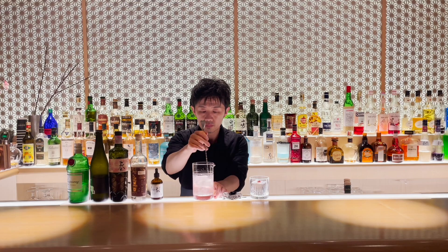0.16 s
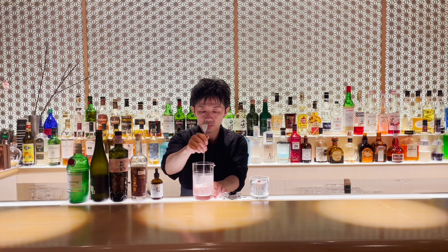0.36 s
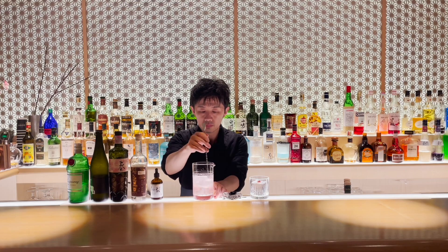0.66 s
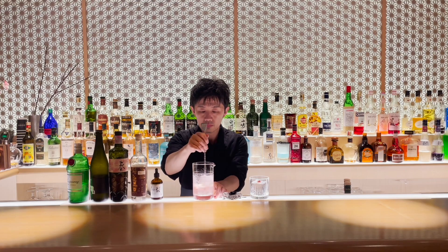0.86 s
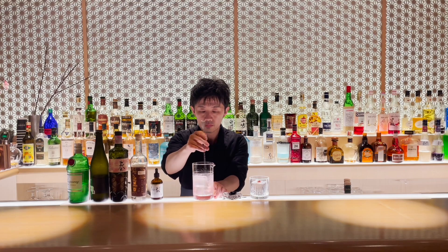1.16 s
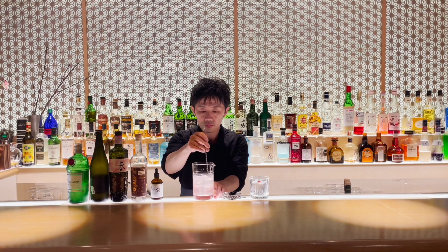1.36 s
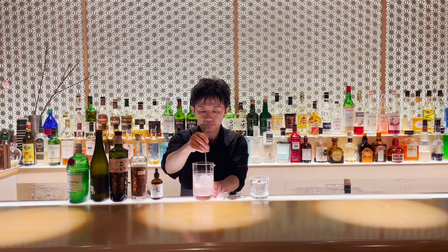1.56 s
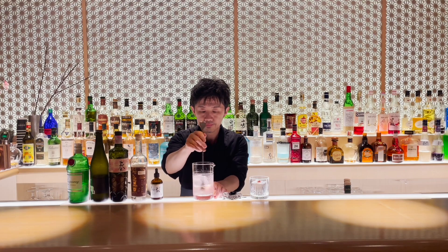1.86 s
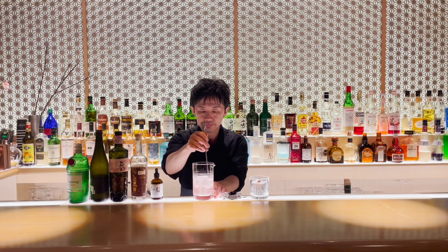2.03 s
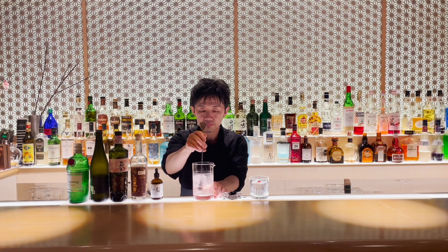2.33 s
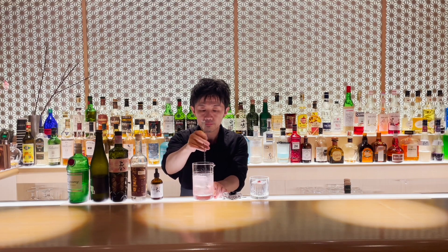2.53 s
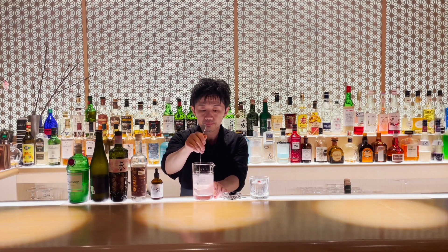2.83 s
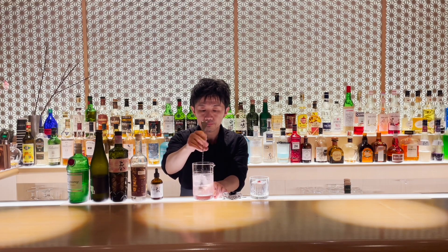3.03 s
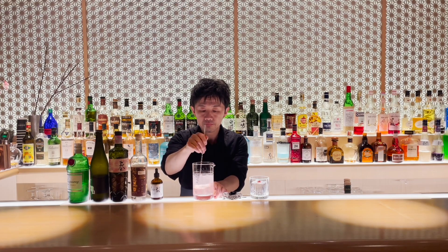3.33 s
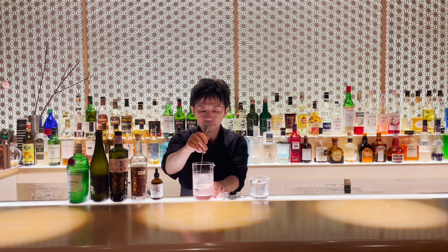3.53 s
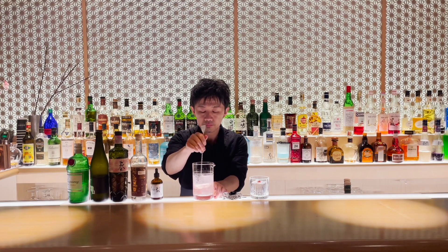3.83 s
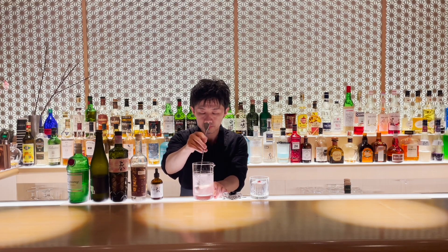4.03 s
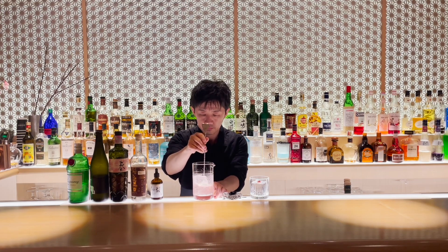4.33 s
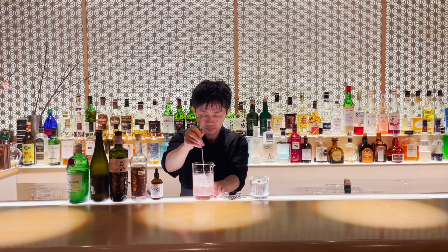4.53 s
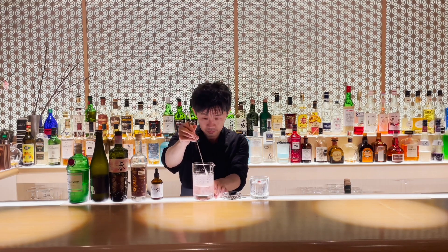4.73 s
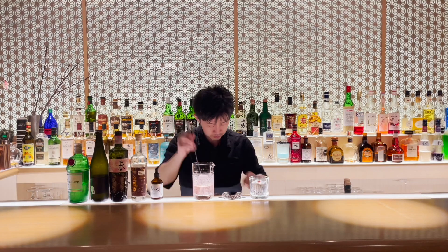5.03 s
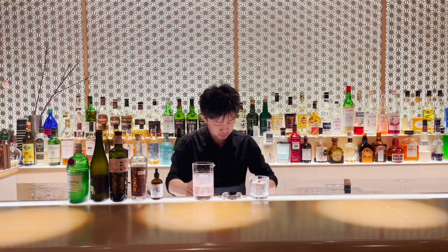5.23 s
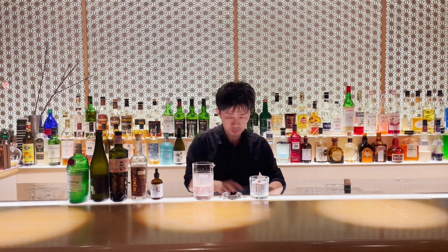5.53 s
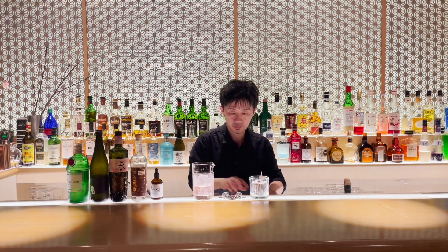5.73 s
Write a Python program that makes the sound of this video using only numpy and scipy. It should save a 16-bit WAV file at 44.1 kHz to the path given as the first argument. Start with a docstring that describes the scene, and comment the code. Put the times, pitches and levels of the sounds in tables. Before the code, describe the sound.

Ice cubes clink and knock in a stirred mixing glass until the spoon is laid on a metal tray, while coolers hum.

```python
"""A quiet bar: a long spoon stirs ice in a mixing glass, slows down, and is laid on a steel tray,
where it settles with a few light taps. The spoon ticks, cubes knock the glass and grate on each other,
and trapped air gurgles in the drink. Cooling machines hum under it all.
A lively room carries the clinks to a pair of microphone ports across the counter."""
import sys
import numpy as np
from scipy import signal
from scipy.fft import rfft, irfft, next_fast_len
from scipy.io import wavfile
from scipy.ndimage import uniform_filter1d

SR = 44100
rng = np.random.default_rng(int(sys.argv[2]) if len(sys.argv) > 2 else 0)


def transcribe(signal):
    """Save signal, clipped to [-1, 1], as a 16-bit WAV file at the path in sys.argv[1]."""
    frames = np.atleast_2d(signal).T
    limited = np.clip(frames, -1, 1)
    pcm = np.round(limited * 32767).astype(np.int16)
    wavfile.write(sys.argv[1], SR, pcm)


N = 259300

# rumble of the room air: freq_hz, relative_db
AIR_SPECTRUM = [(25, -7.5), (45, -3.5), (75, 0), (125, -8), (145, -12.5), (190, -12.5), (220, -20.5),
                (400, -27), (600, -33), (850, -31), (1150, -42), (3000, -51.5), (6000, -60), (12000, -69.5),
                (16000, -92)]
# how alike that rumble is left and right: freq_hz, likeness_share
AIR_LIKENESS = [(30, 0.89), (70, 0.8), (250, 0.75), (450, 0.59), (700, 0.065), (2000, 0.21), (4500, 0.58)]
# machine drones: pitch_hz, level_db, waver_share
DRONES = [(96.6, -46, 0.041), (113.7, -54, 0.0483), (253.9, -65, 0.00504), (434.9, -71, 0.0021)]
# the compressor's wandering hum: time_s, pitch_hz, level_db
COMPRESSOR_CURVE = [(0.0, 47.8, -54), (0.08, 48.46, -40), (0.7, 46.5, -47), (0.82, 49.53, -42.5),
                    (1.28, 46.44, -44), (2.13, 47.04, -38), (2.26, 42.9, -51.5), (2.41, 47.74, -42.5),
                    (3.24, 47.48, -43), (3.32, 46.6, -42), (3.85, 47.72, -47.5), (3.9, 49.4, -57),
                    (4.03, 49.46, -40.5), (4.68, 49.0, -41.5), (4.96, 46.22, -46), (5.27, 48.52, -40),
                    (5.8, 47.04, -42.5), (5.88, 49.8, -48)]
# reverb time: freq_hz, t60_s
ROOM_DECAY = [(500, 0.35), (2000, 0.45), (5000, 0.54), (10000, 0.31), (15000, 0.22)]
# air pockets between the cubes: start_s, level_db, pitch_hz, t60_s, pitch_spread_share
AIR_POCKETS = [(.685, -47, 815, 0.033, .12), (1.048, -48.5, 1414, 0.09, 0.038),
               (1.53, -45, 3410, 0.027, 0.092), (1.542, -45, 2920, 0.026, 0.091),
               (1.808, -48.5, 880, 0.028, 0.11), (2.035, -52, 810, 0.042, 0.13),
               (2.279, -46.5, 807, 0.038, 0.11), (2.285, -53, 1310, .03, 0.32),
               (2.877, -51, 1380, 0.035, .05), (3.178, -58, 810, 0.048, .1),
               (3.347, -48.5, 1360, 0.036, 0.054), (3.799, -52.5, 774, 0.061, 0.088),
               (4.37, -57.5, 810, 0.098, 0.019), (4.413, -55.5, 805, .09, 0.017),
               (4.448, -58, 800, 0.095, .02)]
# low modes of the glass in split pairs, the sixth a dull knock: pitch_hz, level_db, t60_s
WALL_MODES = [(1560, 0.5, 0.27), (1558.4, -3.5, 0.11), (1988, 6, 0.11), (1940, -0.5, 0.057),
              (2586, 1, 0.25), (1543, 4.5, 0.024), (2603, 1, 0.072)]
# the wall's second mode follows the swirling drink: time_s, pitch_hz
SWIRL_PITCH = [(0.3, 2003), (0.7, 1978), (0.9, 1950), (1.38, 1992), (1.55, 1984), (2.0, 1980), (2.3, 2010),
               (2.75, 2023), (3.6, 2070), (4.5, 2013)]
# cubes hit the wall, its second and third modes trimmed against the first:
# start_s, level_db, second_mode_db, third_mode_db, ring_time_share
CUBE_KNOCKS = [(.025, -56.5, -24, -2, 0.59), (.169, -65.5, -27, -17, 0.81), (0.2878, -56, -5.5, -19, 0.53),
               (0.361, -66.5, -11, -2, 0.41), (.413, -60.5, 1, 4, 1), (.5148, -64, -17, -13, 0.43),
               (.538, -67.5, 3.5, -22, 0.67), (0.608, -60, -42, -30, 0.7), (.687, -58.5, 4, 1, 0.54),
               (.778, -57.5, -21, -25, .6), (0.8039, -54.5, -15, -25, 0.47), (0.895, -51, -6, -2.5, 0.78),
               (1.1459, -65, 6, 5, 0.53), (1.24, -58, -1, 1.5, 0.37), (1.327, -58, -4, -23, 0.39),
               (1.377, -59, 7, 2.5, 0.53), (1.463, -65.5, -3, 4, 0.49), (1.538, -59, 6.5, 7, 0.33),
               (1.596, -60.5, -39, -26, 0.5), (1.6696, -62.5, 4, 2, 0.36), (1.682, -58.5, -18, -12, 0.59),
               (1.8081, -67, 4.5, -13, 0.47), (1.85, -68.5, 3, -12, 0.76), (1.902, -63, -18, 3, 0.52),
               (2.034, -59, -1, -3, .55), (2.149, -58, -11, -15, 0.31), (2.2165, -60.5, -19, -4, 0.79),
               (2.268, -55, 6, -15, 0.3), (2.39, -68, -13, -4, 0.65), (2.44, -55, -32, -19, 0.35),
               (2.5118, -67, -2, 1, .8), (2.6209, -63, -3, -6, 0.32), (2.73, -51.5, -6, -7, 0.85),
               (2.8407, -57.5, -25, -28, 0.31), (2.8774, -76, -5, -19, 0.53),
               (2.94, -53.5, -9.5, -2.5, 0.74), (3.0847, -68, 2, -16, .6), (3.1491, -51.5, -8, 0.5, 0.36),
               (3.247, -71, -22, 5.5, 0.47), (3.323, -62.5, -8, -13, 0.47), (3.347, -61.5, 3.5, -17, 0.44),
               (3.3777, -74.5, 3, 12, 1), (3.589, -60.5, -6, -25, 0.89), (3.619, -54.5, -17, -2.5, .8),
               (3.661, -57.5, -2, -6, 1), (3.806, -50.5, -10, -17, 0.66), (3.86, -63, 1, -1, .8),
               (4.04, -58, -19, -8, 0.47), (4.2257, -77, -22, -25, 0.53), (4.297, -64.5, -17, -23, 0.54),
               (4.4787, -68.5, -1, -13, 0.82)]
# one mode stands out of a clink and rings on: start_s, level_db, pitch_hz, t60_s
PINGS = [(.03, -61, 4675, 0.085), (.035, -58, 2794, 0.072), (.12, -61, 6390, 0.048),
         (.121, -59, 10000, .06), (.516, -65, 9960, .05), (.52, -58.5, 6400, .06),
         (0.523, -58, 4500, 0.073), (.61, -65, 9940, 0.091), (0.691, -63, 5610, 0.051),
         (0.807, -58.5, 5740, 0.11), (1.002, -60, 10000, .05), (1.012, -64, 5740, .12),
         (1.098, -64, 9570, .1), (1.24, -56.5, 5770, 0.096), (1.241, -58, 6390, .12),
         (1.46, -55, 9900, .05), (1.462, -57.5, 4997, 0.057), (1.545, -56.5, 3045, 0.037),
         (1.686, -61.5, 9900, 0.076), (2.151, -60.5, 4800, .1), (2.153, -67, 5700, 0.085),
         (2.218, -67, 6900, .08), (2.437, -58, 3310, 0.032), (2.45, -59, 6400, 0.061),
         (2.88, -64, 5890, 0.087), (3.36, -63, 5100, 0.081), (3.625, -57.5, 6407, 0.098),
         (3.835, -63.5, 5275, 0.11), (5.222, -53, 4054, 0.074), (5.7745, -61, 2240, 0.045)]
# colour of a bare clack: freq_hz, relative_db
CLACK_SPECTRUM = [(500, 7), (1200, 8), (2500, 7.5), (4000, -0.5), (7000, -1), (10000, -7.5), (12000, -17.5),
                  (14000, -9), (16000, -33)]
# upper modes of glass and spoon: pitch_hz, level_db, t60_s
GLASS_MODES = [(2990, 6.5, 0.01), (3770, -16, 0.026), (4290, -10.5, 0.14), (4680, -14, 0.043),
               (4940, 2.5, 0.017), (5230, 1.5, 0.017), (5360, -6, 0.065), (5720, 5, 0.028),
               (6356, -3.5, 0.05), (6800, -24.5, 0.075), (7343, -1, 0.13), (7600, -12, 0.098),
               (8780, 1.5, 0.042), (9300, 1.5, 0.032), (9920, -1, 0.049), (10060, -15, 0.07),
               (11600, -14, 0.044), (11030, -10, 0.072), (12700, -14.5, 0.025), (14200, -27.5, 0.069),
               (13000, -1.5, 0.023)]
# modes of the steel tray: pitch_hz, level_db, t60_s
TRAY_MODES = [(686, 3, 0.075), (888, -16, 0.089), (1490, -3, 0.065), (1722, -0.5, 0.041), (2240, 0, 0.028),
              (2540, -20, 0.04), (3650, -5, 0.082), (4200, 3, 0.026), (4120, 2, 0.063), (4400, -8, 0.1),
              (5190, -13, 0.063), (6370, -8, 0.026), (6480, 0.5, 0.036), (7010, -1, 0.072),
              (9140, -6, 0.085), (9720, -9.5, 0.091), (13000, -24, 0.056)]
# modes of the bouncing spoon: pitch_hz, level_db, t60_s
SPOON_MODES = [(3050, -0.5, 0.18), (3760, -0.5, 0.21), (4130, -23, .3), (4650, -4.5, 0.5),
               (6045, -6.5, 0.46), (6880, 0, 0.09), (10900, -5, 0.039), (11956, -10, .055)]
# modes of the spoon lying on the tray: pitch_hz, level_db, t60_s
RESTING_SPOON_MODES = [(1840, -10, 0.089), (3580, -8, 0.079), (3768, -5, 0.27), (3920, 1, .08),
                       (4075, -1, 0.23), (4320, -7, 0.091), (4760, -15, .1), (6470, -3, 0.19),
                       (6568, 1, 0.17), (6900, -6, .15), (7036, -5.5, 0.23), (9800, -1, 0.12)]
# spoon against ice and glass: start_s, level_db, bright_hz, rolloff_db_per_octave, top_end_db, slide_s
STIR_TICKS = [(0.0219, -48.5, 4360, -1, 0, 0.0075), (0.118, -48.5, 3980, 14, -6, 0.0054),
              (0.2863, -55.5, 4260, 16, -6.5, 0.028), (0.378, -51.5, 5700, 5, -2, 0.0033),
              (0.513, -48.5, 5100, 10, -0.5, .003), (0.606, -53, 4787, 0, 5, .004),
              (0.7708, -52.5, 3630, 21, -5.5, 0.0068), (0.8062, -54, 5750, 37, -21, 0.003),
              (0.85, -50.5, 3130, -1, 2.5, 0.0046), (0.895, -55, 5170, 11, -25, .004),
              (0.998, -50.5, 5100, -2.5, 2.5, 0.012), (1.012, -49.5, 1600, 58, -27, .006),
              (1.03, -47, 3660, 15, -8, 0.0058), (1.093, -50.5, 5740, -8, 4.5, 0.0068),
              (1.237, -47.5, 5630, 6, -2.5, .006), (1.322, -47, 4240, 13, -3, 0.0057),
              (1.457, -49.5, 4770, 0.5, 4.5, .006), (1.6837, -52.5, 4850, 15, -1.5, 0.0067),
              (1.764, -54, 3700, 7, 0, 0.0034), (1.9062, -52, 4280, -2.5, 3, 0.021),
              (1.996, -54, 5040, 5, -2, .006), (2.1498, -52, 5100, 15, 1, 0.0032),
              (2.2158, -48.5, 4954, 17, -2, 0.0056), (2.384, -54.5, 2900, 15, -11, 0.0031),
              (2.4359, -47, 3800, 16, -1, 0.0033), (2.449, -48.5, 6200, 10, -5.5, 0.0048),
              (2.684, -52.5, 4800, 15, 1.5, 0.016), (2.7, -48, 2908, 29, -8, 0.0042),
              (2.8782, -52.5, 5935, 5.5, 1, 0.003), (2.91, -51.5, 3700, 11, -6, 0.018),
              (2.94, -55.5, 3250, 17, -24, 0.0074), (3.081, -52, 5172, 7.5, -5, 0.0048),
              (3.1271, -53.5, 5110, 1, -2, 0.015), (3.318, -55, 5520, 16, -5, 0.014),
              (3.3572, -52.5, 5400, 6.5, -3, 0.01), (3.5384, -57.5, 4840, 7.5, -2, 0.0029),
              (3.6195, -45, 5490, 3, 2.5, 0.013), (3.643, -64, 4480, 4, -8, 0.0083),
              (3.76, -54.5, 3315, 7, -11, 0.016), (3.803, -51.5, 3700, 11, -9, 0.016),
              (3.834, -49.5, 5240, 14, -7, 0.012), (4.0412, -67, 3087, 9, -23, 0.006),
              (4.1765, -72, 5783, 10, -0.5, 0.0046), (4.2677, -63.5, 3083, -3, -2.5, 0.0044),
              (4.476, -66.5, 5690, 26, -25, .006)]
# hits that ring the tray: start_s, level_db, bright_hz, rolloff_db_per_octave, top_end_db, slide_s
TRAY_HITS = [(5.208, -46.5, 6500, 19.3, -2, 0.014), (5.2206, -45.5, 4200, 4.9, -1.5, 0.0027),
             (5.245, -67, 4100, 14, -6, .005), (5.285, -67, 1750, 29, -20, .005),
             (5.313, -49.5, 5560, 14, -1, .008), (5.335, -48.5, 1490, 10, 3, 0.0054),
             (5.358, -47, 6550, 6.3, 1, 0.0071), (5.385, -46, 5900, 6.4, -2, 0.0062),
             (5.43, -54.5, 5980, 13, 2.5, .005), (5.40, -43.5, 2300, 26, -20, 0.0026),
             (5.405, -45.5, 940, 76, -17, 0.0037), (5.425, -51, 2300, 28, -13, 0.0036),
             (5.45, -60, 2300, 28, -14, .005), (5.44, -50, 1420, 105, -20, 0.0045),
             (5.50, -71, 2220, 29, -16, .005), (5.547, -51.5, 4120, 7.7, 6, 0.0064),
             (5.59, -56.5, 1800, 38, -14, 0.0076), (5.7745, -58, 2266, 27, -21, 0.0014)]
# bounces that ring the spoon: start_s, level_db, bright_hz, rolloff_db_per_octave, top_end_db, slide_s
SPOON_BOUNCES = [(5.3574, -44.5, 4198, 1.3, 0.5, 0.00088), (5.412, -48.5, 4690, 8.7, -8, 0.0023),
                 (5.447, -45, 3740, 18, -11, .001), (5.478, -56, 3030, 20, -3, 0.0038),
                 (5.51, -49, 3770, 40, -18, .001)]
# the spoon's last light taps: start_s, level_db, bright_hz, rolloff_db_per_octave, top_end_db, slide_s
SETTLING_TAPS = [(5.548, -56, 4000, 1.8, -9, 0.0063), (5.577, -54.5, 4000, 5.8, 4, 0.0044),
                 (5.615, -57, 6500, 9.3, -2, 0.0036), (5.665, -64, 6500, 5.1, -6, 0.0055),
                 (5.78, -64, 3800, 9.7, -12, 0.0054), (5.84, -67.5, 3800, 3, -7, .006)]
# phase by which the left port leads: freq_hz, lead_rad
PORT_LEAD = [(0, 0), (1500, 0), (2800, .5), (5100, .7), (5700, 0), (6900, -1.3), (7650, -np.pi),
             (8800, -np.pi), (9200, -4.2), (10600, -2 * np.pi), (12500, -2 * np.pi), (13400, -8.3),
             (14300, -3 * np.pi)]
# balance of the ports: freq_hz, left_over_right_db
PORT_BALANCE = [(30, 0), (80, 2.5), (1000, 0.3), (2500, 2), (5200, 4), (6800, 3), (7700, 0.7)]
# what both ports hear alike: freq_hz, likeness_share
PORT_LIKENESS = [(1000, 0.01), (6500, 0.29), (7700, 1), (8600, 0.97), (9300, 0.76), (10200, 0.22),
                 (10800, 1), (12400, 1), (13200, 0.21), (14200, .9)]


def amp(db):
    """dB to gain."""
    return 10 ** (np.asarray(db) / 20)


def unit_rms(x):
    """Scales to rms 1."""
    return x / np.sqrt(np.mean(x ** 2) + 1e-20)


def curve_at(points, hz):
    """Reads a curve on a log-frequency axis."""
    freq_hz, value = np.transpose(points)
    return np.interp(np.log(hz + 1), np.log(freq_hz + 1), value)


def add(mix, start_s, sound):
    """Mixes a sound in at start_s."""
    part = mix[round(start_s * SR):][:len(sound)]
    part += sound[:len(part)]


def ring(hz, db, t60):
    """A struck body: one dying sine a mode."""
    t = np.arange(SR // 3)[:, None] / SR
    return (amp(db - 60 * t / np.maximum(t60, .01)) * np.sin(2 * np.pi * hz * t)).sum(1)


def waver(first_span, second_span):
    """Random drift at rms 1: noise smoothed twice, spans in samples."""
    return unit_rms(uniform_filter1d(uniform_filter1d(rng.standard_normal(N), first_span), second_span))


def contacts(per_s, spread_db):
    """Random impulses of uneven strength."""
    return (rng.random(N) < per_s / SR) * amp(spread_db * np.minimum(rng.exponential(1, N), 3))


def room_air(level_db=-45):
    """A bed of dark noise, nearly mono in the bass and wider above."""
    hz = np.fft.rfftfreq(N, 1 / SR)
    noise = rng.standard_normal((len(hz), 4)).T
    left, unrelated = noise[::2] + 1j * noise[1::2]
    likeness = curve_at(AIR_LIKENESS, hz)
    right = likeness * left + np.sqrt(1 - likeness ** 2) * unrelated
    spectrum = np.array([left, right]) * amp(curve_at(AIR_SPECTRUM, hz)) * (hz > 20)
    return amp(level_db) * unit_rms(irfft(spectrum, N))


def machine_drones():
    """Cooling machines hold low tones, steady in level and wavering in pitch."""
    out = np.zeros(N)
    for centre_hz, level_db, waver_share in DRONES:
        pitch_hz = centre_hz * (1 + waver_share * waver(4000, 2500))
        out += np.sqrt(2) * amp(level_db) * np.sin(2 * np.pi * np.cumsum(pitch_hz) / SR)
    return out


def compressor(flutter_db=2.5, flutter_s=0.1):
    """A deep hum that wanders in pitch, swells and flutters quickly in level."""
    time_s, pitch_hz, level_db = np.transpose(COMPRESSOR_CURVE)
    t, span = np.arange(N) / SR, round(flutter_s * SR)
    envelope = amp(np.interp(t, time_s, level_db) + flutter_db * waver(span, span))
    phase = 2 * np.pi * np.cumsum(np.interp(t, time_s, pitch_hz)) / SR
    return np.sqrt(2) * envelope * np.sin(phase)


def room_reverb(send, crossfade_hz=3.1):
    """Sparse reflections, each band dying at its own speed; three tails trade as glass and hands move."""
    taps = np.zeros((3, 2, SR // 2))
    grid = np.arange(120, SR // 2 - 20, 20)
    arrivals = grid + rng.integers(0, 20, (3, 2, len(grid)))
    np.put_along_axis(taps, arrivals, rng.choice([-1., 1.], arrivals.shape), 2)
    taps[:, 1] = 0.42 * taps[:, 0] + 1.07 * taps[:, 1]  # close ports share part of the tail
    hz, t, bands = signal.stft(taps, SR, nperseg=256)
    decay = amp(-60 * t / curve_at(ROOM_DECAY, hz)[:, None])
    tails = signal.istft(bands * decay, SR, nperseg=256)[1]
    tails /= np.linalg.norm(tails, axis=2, keepdims=True)
    cycles = crossfade_hz * np.arange(N) / SR + np.arange(3)[:, None] / 3
    crossfade = np.sqrt(2 / 3) * np.cos(2 * np.pi * cycles)
    return signal.fftconvolve((send * crossfade)[:, None], tails, axes=2)[:, :, :N].sum(0)


def ice_rattle(relative_db=-4, rest_db=-84.5, settle_t60_s=0.083):
    """Small cubes jostle after each knock: faint contacts ring the whole glass, damped by the ice."""
    jostle, envelope = np.zeros(N), np.zeros(N)
    for hz, mode_db, t60 in WALL_MODES + GLASS_MODES:
        jostle += signal.oaconvolve(contacts(per_s=40, spread_db=3.5), ring(hz, mode_db, .3 * t60))[:N]
    for start_s, level_db, *_ in CUBE_KNOCKS:
        add(envelope, start_s, amp(level_db + relative_db - 60 * np.arange(SR) / SR / settle_t60_s))
    stirring = np.arange(N) / SR < CUBE_KNOCKS[-1][0]
    return unit_rms(jostle) * (envelope + amp(rest_db) * stirring)


def ice_scrape(relative_db=-21.5, t60_s=0.22, grains_per_s=44, colours=8):
    """Ice grates on ice and spoon: tiny bright grains that fade after each tick."""
    grit, envelope = np.zeros(N), np.zeros(N)
    hz, t = np.fft.rfftfreq(512, 1 / SR), np.arange(512) / SR
    for centre_hz in np.geomspace(3500, 13000, colours):
        colour_db = curve_at(CLACK_SPECTRUM, hz) - 22 * abs(np.log2((hz + 1) / centre_hz))
        grain = irfft(rfft(rng.standard_normal(512)) * amp(colour_db)) * amp(-60 * t / 0.012)
        grit += signal.oaconvolve(contacts(grains_per_s / colours, spread_db=4.5), grain)[:N]
    for start_s, level_db, *_ in STIR_TICKS:
        add(envelope, start_s, amp(level_db + relative_db - 60 * np.arange(SR) / SR / t60_s))
    return unit_rms(grit) * envelope


def gurgles(bubbles=5, max_lag_s=.008, attack_s=0.00032):
    """Each trapped air pocket breaks into a few bubbles that ring briefly and rise in pitch."""
    out, t = np.zeros(N), np.arange(SR // 8) / SR
    for start_s, level_db, pitch_hz, t60, spread in AIR_POCKETS:
        envelope = (1 - np.exp(-t / attack_s)) * amp(level_db - 60 * t / t60) / np.sqrt(bubbles)
        for shift, lag in rng.uniform(-1, 1, (bubbles, 2)):
            chirp = np.sin(2 * np.pi * pitch_hz * (1 + spread * shift) * (t + 0.87 * t ** 2))
            add(out, start_s + max_lag_s * lag ** 2, envelope * chirp)
    return out


def cube_knocks(attack_s=.0015, detune=0.0015, scatter_db=1.5):
    """Blunt cubes ring the wall's three lowest modes; split pairs beat, the swirl retunes the second."""
    out = np.zeros(N)
    mode_hz, mode_db, t60 = np.transpose(WALL_MODES)
    attack = 1 - np.exp(-np.arange(SR // 3) / SR / attack_s)
    for start_s, level_db, second_db, third_db, ring_share in CUBE_KNOCKS:
        trim_db = np.array([0, 0, second_db, second_db, third_db, 0, third_db])
        scatter, shift = rng.standard_normal((2, len(mode_hz)))
        pitch_hz = mode_hz * (1 + detune * shift)
        pitch_hz[2:4] *= np.interp(start_s, *np.transpose(SWIRL_PITCH)) / mode_hz[2]
        struck_db = level_db + mode_db + trim_db + scatter_db * scatter
        add(out, start_s, attack * ring(pitch_hz, struck_db, ring_share * t60))
    return out


def pings(split_share=0.0042):
    """Single modes of glass, ice and steel sing out, each a close, beating pair."""
    out = np.zeros(N)
    for start_s, level_db, pitch_hz, t60 in PINGS:
        pair_hz = pitch_hz * (1 + split_share * rng.uniform(-1.24, 1, size=2))
        add(out, start_s, ring(pair_hz, level_db, t60))
    return out


def hit_eq_db(hz, bright_hz, rolloff, top_end_db):
    """The colour of one hit: a peak at bright_hz, and a flat shelf from 7.5 kHz up."""
    return np.where(hz < 7500, -abs(rolloff * np.log2((hz + 1) / bright_hz)), top_end_db)


def clinks(hits, modes, ring_db, clack_db, snap_db, scatter_db, detune):
    """Hard hits: a bright snap, then a chatter of contacts that each clack and ring split modes."""
    out = np.zeros(N)
    mode_hz, mode_db, t60 = np.transpose(modes + modes)  # two of each, detuned into pairs
    hz, t = np.fft.rfftfreq(1024, 1 / SR), np.arange(2048) / SR
    attack_s, clack_t60_s, snap_t60_s, snap_loss_db_per_s = .001, 0.04, 0.004, 900
    for start_s, level_db, bright_hz, rolloff, top_end_db, slide_s in hits:
        eq = bright_hz, rolloff, top_end_db
        noise, contact, touch = rng.standard_normal((3, 2048))
        chatter = (abs(contact) > 2.4) * abs(noise) * np.exp(-t / max(slide_s, .001))
        chatter[0] = 0.72  # the first contact
        clack_colour = amp(curve_at(CLACK_SPECTRUM, hz) + hit_eq_db(hz, *eq))
        clack = unit_rms(irfft(rfft(noise[:1024]) * clack_colour))
        pitch_hz = mode_hz * (1 + detune * touch[:len(mode_hz)])  # ice or hand shifts the modes a little
        struck_db = ring_db + mode_db + hit_eq_db(mode_hz, *eq) + scatter_db * touch[-len(mode_hz):]
        body = ring(pitch_hz, struck_db, t60)
        add(body, 0, clack * amp(clack_db - 60 * t[:1024] / clack_t60_s))
        clink = signal.oaconvolve(body, chatter / np.linalg.norm(chatter))
        clink *= 1 - np.exp(-np.arange(len(clink)) / SR / attack_s)
        snap = unit_rms(np.diff(contact[:203], 3))
        onset_db = snap_db + top_end_db - snap_loss_db_per_s * slide_s  # a longer slide snaps less
        add(clink, 0, snap * amp(onset_db - 60 * t[:200] / snap_t60_s))
        add(out, start_s, amp(level_db) * clink)
    return out


def tray_clatter():
    """The steel tray clanks as the spoon lands on it."""
    return clinks(TRAY_HITS, TRAY_MODES,
                  ring_db=-7.5, clack_db=-1, snap_db=-18, scatter_db=1.5, detune=0.0066)


def spoon_settling():
    """The spoon settles on the tray and rings on with a few last light taps."""
    return clinks(SETTLING_TAPS, RESTING_SPOON_MODES,
                  ring_db=-9.5, clack_db=-2.5, snap_db=-15, scatter_db=0.5, detune=0.0039)


def spoon_landing(rest_s=5.545, damping_db_per_s=900):
    """The spoon bounces on the tray, its free ring choked as it lies down."""
    bounces = clinks(SPOON_BOUNCES, SPOON_MODES,
                     ring_db=-7, clack_db=2.5, snap_db=-24, scatter_db=1, detune=0.00064)
    return bounces * amp(-damping_db_per_s * np.maximum(np.arange(N) / SR - rest_s, 0))


def stirring_spoon():
    """The spoon ticks against ice and glass: crisp snaps with a light ring."""
    return clinks(STIR_TICKS, GLASS_MODES,
                  ring_db=-13, clack_db=0, snap_db=5, scatter_db=3.5, detune=0.0092)


def scene():
    """Glass, spoon and tray, direct and through the room, over the bed of air and machines."""
    bright = stirring_spoon() + pings() + ice_rattle() + ice_scrape() + tray_clatter() + spoon_settling()
    spoon, knocks, drink = spoon_landing(), cube_knocks(), gurgles()
    # long rings and gurgles reach the walls less than the clinks do
    send = bright + amp(-2) * (knocks + drink) + amp(-8.5) * spoon
    reverb = amp(3.5) * room_reverb(send)
    bed = room_air() + machine_drones() + compressor()
    return bright + knocks + drink + spoon + reverb + bed


def record(dry, cutoff_hz=15780):
    """Two ports in one housing: treble much alike but shifted in phase, left a bit louder; a high cut."""
    size = next_fast_len(N + 4096)
    hz = np.fft.rfftfreq(size, 1 / SR)
    left, right = rfft(dry, size)
    likeness = curve_at(PORT_LIKENESS, hz)
    right = likeness * left + np.sqrt(1 - likeness ** 2) * right * (1 - 0.028 * likeness)
    lead_rad = np.interp(hz, *np.transpose(PORT_LEAD))
    half_offset = np.exp(.5j * lead_rad) * amp(curve_at(PORT_BALANCE, hz) / 2)
    ports = irfft([left * half_offset, right / half_offset], size)[:, :N]
    high_cut = signal.firwin(511, cutoff_hz, window=("kaiser", 9), fs=SR)
    return signal.oaconvolve(ports, high_cut[None], "same")


dry = scene()
out = record(dry)
transcribe(out)
```